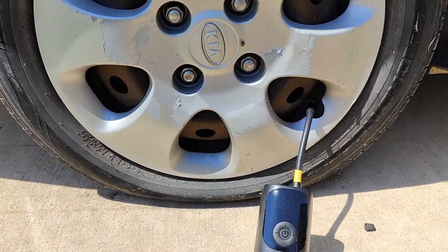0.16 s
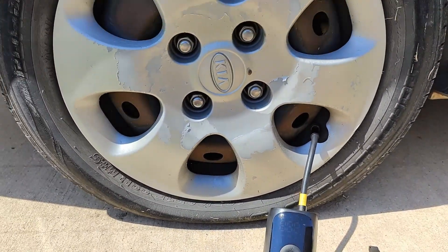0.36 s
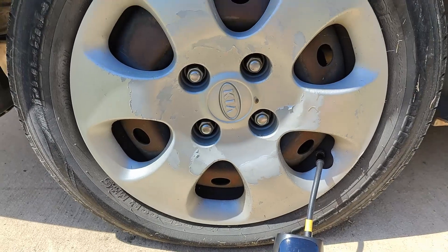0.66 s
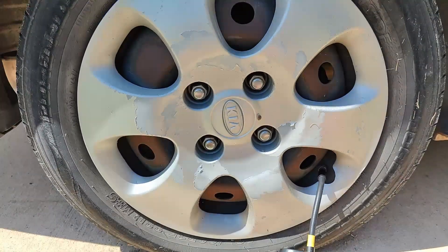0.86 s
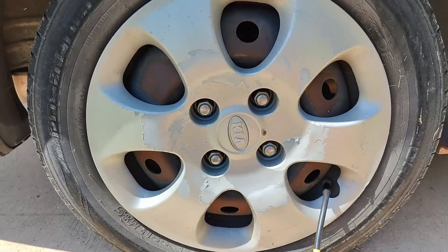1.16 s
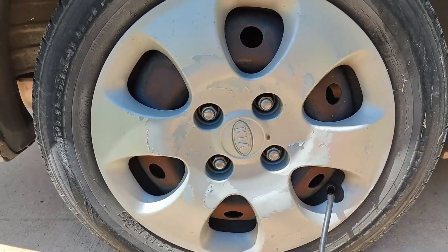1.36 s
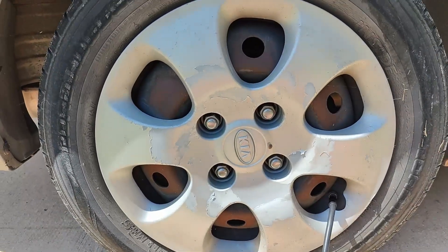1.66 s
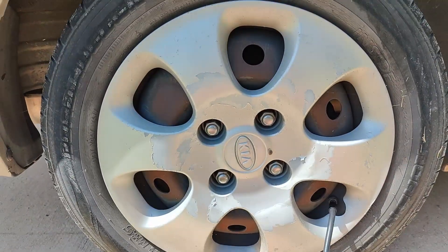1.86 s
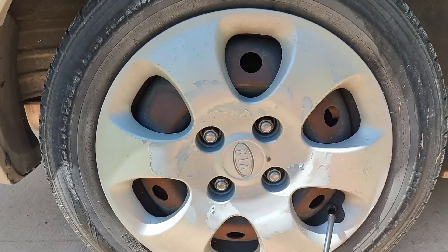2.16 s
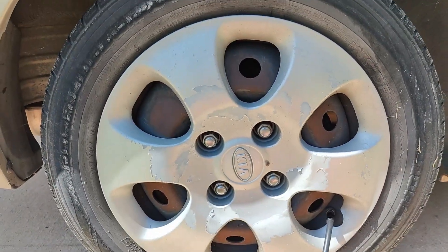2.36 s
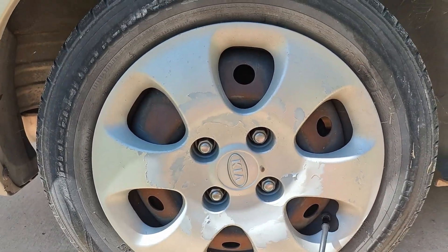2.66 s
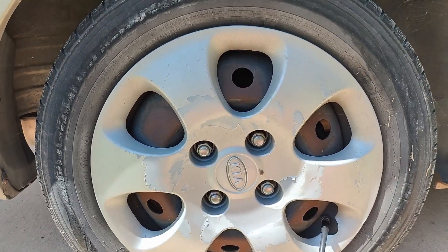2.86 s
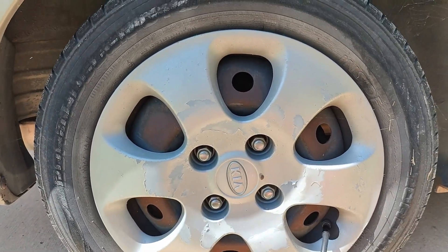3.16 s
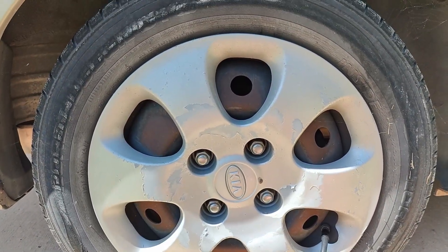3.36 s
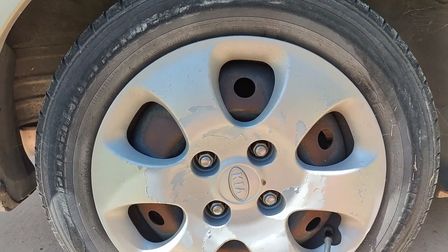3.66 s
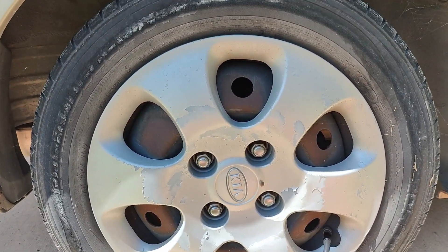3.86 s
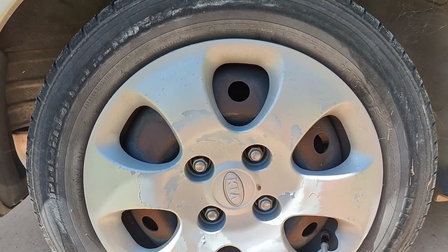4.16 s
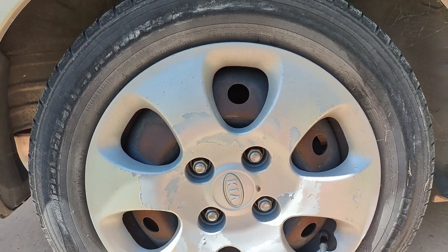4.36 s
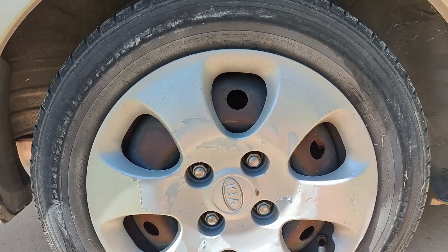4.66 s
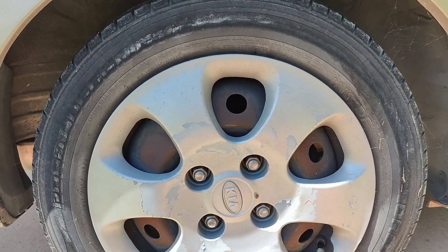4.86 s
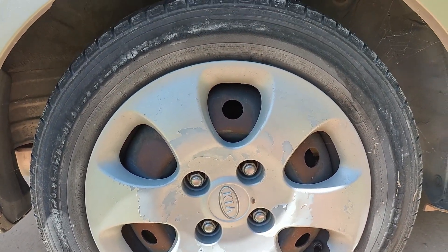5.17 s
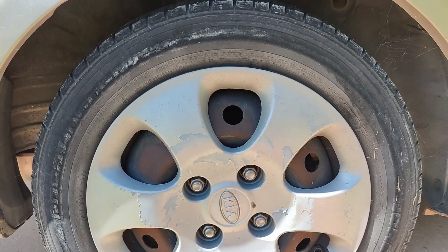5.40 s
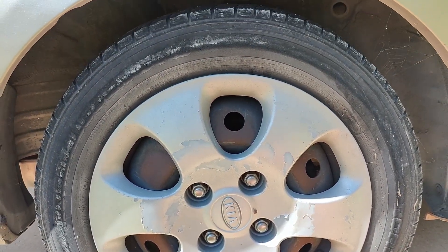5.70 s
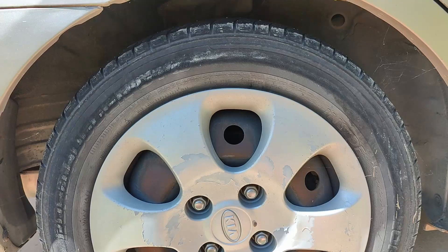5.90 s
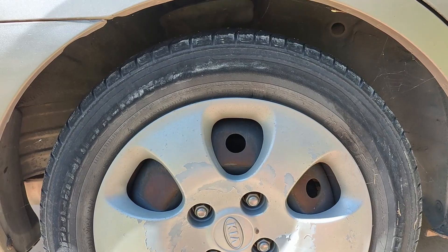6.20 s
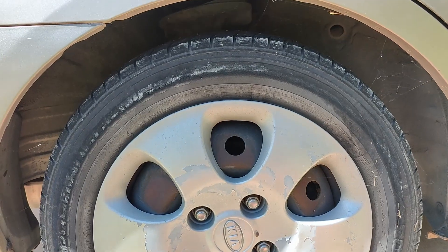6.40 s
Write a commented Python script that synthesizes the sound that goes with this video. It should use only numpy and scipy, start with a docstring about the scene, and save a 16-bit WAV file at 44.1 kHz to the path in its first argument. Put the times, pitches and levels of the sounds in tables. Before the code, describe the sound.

A portable tire inflator runs without a break on concrete beside a car wheel, giving a bright, rattling buzz with a thin, fluttering hiss and a faint low hum underneath. Midway, wind bumps gently against the microphone. The motor's pitch sags very slightly as pressure builds, and the color of the buzz shifts as the nearby microphone rises away from the pump.

```python
"""A small compressor pumps up a car tire

A hand-sized piston pump stands on concrete and makes about 51 strokes a second. Every turn of its crank
brings the same knocks (piston, valves, slack gears), a loose rattle, a gasp of air and faint chirps.
The motor slows a little as the pressure builds. The microphone drifts upward, so the tone slowly shifts.
Underneath are a faint hum and two soft puffs of wind."""
import sys
import numpy as np
from scipy import signal
from scipy.fft import rfft, irfft, next_fast_len
from scipy.io import wavfile
from scipy.ndimage import uniform_filter1d, map_coordinates

SR = 44100
rng = np.random.default_rng(int(sys.argv[2]) if len(sys.argv) > 2 else 0)


def store_wav(level_fs):
    """Save 16-bit WAV to argv[1]."""
    pcm = np.round(np.clip(np.atleast_2d(level_fs), -1, 1) * 32767)
    wavfile.write(sys.argv[1], SR, pcm.T.astype(np.int16))


N = 288404
TIME = np.arange(N) / SR
FFT_SIZE = 2 * next_fast_len(N // 2 + 1)
FREQS = np.fft.rfftfreq(FFT_SIZE, 1 / SR)

# the knocks of one turn: (place in the turn [0-1], strength [dB], ring pitch [Hz], ring width [Hz])
KNOCKS = [(0.0757, -12.8, 460, 332), (0.2805, -6.5, 1237, 593), (0.321, -0.6, 2374, 262),
          (0.3464, -8.7, 3756, 558), (0.4334, 2.4, 2079, 223), (0.4512, -5.5, 3045, 548),
          (0.5517, -1.8, 2962, 396), (0.5558, -3.0, 1099, 584), (0.6426, -2.6, 1884, 896),
          (0.6917, -3.4, 3562, 483)]
# how well the housing gives off each harmonic: (multiple of the crank rate [count], level [dB])
HOUSING_LOW = [(1, -39.2), (2, -38.0), (3, -56.0), (4, -40.5), (5, -49.8), (6, -43.6), (7, -47.4),
               (8, -40.3), (9, -43.7), (10, -40.8), (11, -38.6), (12, -43.4), (13, -44.2), (14, -40.1),
               (15, -36.0), (16, -46.2), (17, -51.6), (18, -44.4), (19, -33.1), (20, -36.7), (21, -33.3),
               (22, -33.1), (23, -34.8), (24, -36.0), (25, -43.6), (26, -43.6), (27, -46.9), (28, -34.8),
               (29, -38.2), (30, -38.4), (31, -37.5), (32, -46.0), (33, -41.4), (34, -44.1), (35, -36.3),
               (36, -29.2), (37, -31.0), (38, -37.5), (39, -45.0), (40, -40.7), (41, -38.3), (42, -29.3),
               (43, -28.9), (44, -30.8), (45, -42.8), (46, -31.3), (47, -29.5), (48, -37.0), (49, -42.1),
               (50, -39.4)]
# the same for the harmonics above those: (pitch [Hz], level [dB])
HOUSING_HIGH = [(2620, -40), (2850, -48.5), (3100, -40), (3450, -42), (3750, -39.5), (3950, -46.5),
                (4200, -48), (4600, -55), (5200, -62.5), (5700, -79)]
# each ringing tone of the housing beams toward one height:
# (pitch [Hz], width [Hz], height [0-1], spread in height [0-1], boost [dB])
HOUSING_BEAMS = [(480, 97, 0, .2, 2), (656, 48, 1, 0.3, 2), (1120, 130, 0.4, 0.11, 0), (1440, 60, 0, .2, 4),
                 (2140, 73, 0.53, 0.14, 1.5), (2430, 40, 0.27, 0.33, 2.5), (3100, 42, .25, 0.31, 2.5),
                 (3510, 52, 0.5, 0.22, 6.5), (3970, 42, 0, 0.63, 4), (4400, 54, 0.9, .1, 9)]
# tone of the loose gears and housing: (pitch [Hz], level [dB])
RATTLE_TONE = [(50, -43.3), (150, -47.6), (350, -52.9), (600, -48.0), (800, -43.0), (900, -44.8),
               (1050, -37.6), (1300, -46.7), (1500, -42.0), (1700, -42.6), (1880, -35.7), (2050, -39.1),
               (2400, -39.7), (2800, -46.3), (4000, -43.9), (4700, -50.3)]
# tone of the air in the valves and vents: (pitch [Hz], level [dB])
HISS_TONE = [(4700, -45), (5700, -55.5), (6200, -51.5), (6600, -46), (7100, -46.5), (7700, -56),
             (9600, -51.5), (10700, -57), (11200, -45), (11700, -57), (12700, -58.5), (14300, -57),
             (15100, -53.5), (15600, -46.5)]
# air flow over one turn: (place in the turn [0-1], level [dB])
AIR_FLOW = [(.08, -11.5), (.19, -7), (.25, -3), (.42, -0.5), (.57, -4), (.65, -7.5), (.8, -5.5), (.92, -5)]
# the piston seal chirps going up and down: (place in the turn [0-1], width [turns], level [dB])
SEAL_CHIRPS = [(.24, 0.12, -16), (.5, 0.043, -14.5), (.74, .045, -12.5)]
# wind on the microphone: (time [s], width [s], pitch [Hz], level [dB])
WIND_PUFFS = [(3.441, 0.02, 32, -25), (3.518, 0.064, 120, -36)]
# the microphone rises from the pump to the top of the wheel: (time [s], height [0-1])
MIC_RISE = [(0, 0), (1, 0.32), (2.5, 0.66), (5.4, 0.83), (6, 1)]
# balance of the two sides: (pitch [Hz], left minus right [dB])
STEREO_BALANCE = [(150, 2), (430, -2.5), (620, 9), (980, -9.5), (1250, -3.5), (1550, -7), (1900, -2.5),
                  (2500, -2.5), (3100, 6), (3650, 7.5), (4500, 2), (5600, -4.5), (6800, -19), (7900, -6),
                  (8500, -13.5), (10000, -4), (11900, -4.5), (13400, -16), (15500, -25.3)]
# how alike the two sides are: (pitch [Hz], likeness [0-1])
STEREO_LIKENESS = [(60, 0.99), (400, 1), (1000, 1), (2200, 1), (3500, 0.58), (6000, 0.25), (15000, 1)]
# how far the left wave runs ahead of the right: (pitch [Hz], lead [radians])
LEFT_LEAD = [(60, 0.06), (300, 0.46), (700, 1), (1000, -0.4), (1500, -1.26), (2300, -1), (3100, -1.06),
             (4000, -2.5), (7000, -1.65), (15000, -1.5)]


def crank(start_turn=.8106, start_hz=51.4833, sag_hz_per_s2=.0097, wobble=0.000405):
    """Counts the crank's turns. It slows more and more as the pressure builds."""
    speed = (start_hz - sag_hz_per_s2 * TIME ** 2) * (1 + wobble * wander(N, size=2500))
    return start_turn + np.cumsum(speed) / SR


def knocks(turns, level_db=0.37, drift_db=1.26, force_db=0.1, slop_turns=0.00058, turn_samples=2048):
    """Ringing knocks repeat every turn and blur into a buzz; the housing sets each harmonic's level."""
    strokes, low = int(turns[-1]) + 2, len(HOUSING_LOW)
    harmonic = np.arange(1, 113)
    hz = harmonic * (turns[-1] - turns[0]) / TIME[-1]
    blows = sum(amp(db) * np.exp(-2j * np.pi * harmonic * place)
                / (1 + 1j * (hz ** 2 - ring ** 2) / (hz * width)) for place, db, ring, width in KNOCKS)
    # low down, single housing tones set the level; higher up they overlap and the knocks' peaks remain
    strength = np.sqrt(smooth(abs(blows) ** 2, size=7))
    blows = blows / np.r_[abs(blows[:low]), strength[low:]]
    level = np.r_[np.transpose(HOUSING_LOW)[1], look_up(HOUSING_HIGH, hz[low:])]
    # tones swell and fade as the microphone moves through echoes off the ground and wheel
    stroke_times = np.interp(np.arange(strokes) + .5, turns, TIME)
    level = level + housing_beams(stroke_times, hz)
    level = level + drift_db * np.sqrt(hz / 1500) * wander((strokes, len(harmonic)), size=70)
    # no two strokes have quite the same force or timing
    force, lag = rng.standard_normal((2, strokes, 1))
    delay = np.exp(-2j * np.pi * harmonic * slop_turns * lag)
    direct = amp(level + level_db + force_db * force) * blows * delay
    # only high tones scatter off the wheel
    scattered = direct * 1j * np.clip(hz / 5000, 0, 1) ** 2 * np.sign(wander(len(harmonic), size=7))
    # build one wave per stroke, then play through them at the crank's pace
    spectra = np.pad(stereo(direct, scattered, hz), ((0, 0), (0, 0), (1, 0)))
    waves = irfft(spectra, turn_samples) * turn_samples / np.sqrt(2)
    position = [np.maximum(turns - .5, 0), turns % 1 * turn_samples]
    return np.array([map_coordinates(side, position, order=1, mode="grid-wrap") for side in waves])


def housing_beams(times, hz, near_db=-.1, far_loss_db=0.9):
    """Level change in dB as the microphone draws away and passes through the housing's beams of sound."""
    height = mic_height(times)[:, None]
    beams = sum(db * bell(hz, ring, width) * bell(height, aim, spread)
                for ring, width, aim, spread, db in HOUSING_BEAMS)
    return near_db - far_loss_db * height + beams


def rattle(pump, level_db=-1.2, follow=.42, flicker_db=.5):
    """Loose parts buzz at random; each pitch range swells with the knocks that shake it."""
    edges_hz = [0, 650, 1350, 2700, SR / 2]
    spectrum = rfft(pump.mean(0), FFT_SIZE)
    shaken = 0
    for low, high in zip(edges_hz, edges_hz[1:]):
        band = (FREQS >= low) & (FREQS < high)
        power = uniform_filter1d(irfft(spectrum * band)[:N] ** 2, size=70)
        shake = normalize(np.sqrt(abs(power)))
        swell = (1 - follow + follow * shake) * amp(flicker_db * wander(N, size=120))
        shaken = shaken + rfft(normalize(swell * rng.standard_normal((2, N))), FFT_SIZE) * band
    treble_cut = 1 / np.sqrt(1 + (FREQS / 4700) ** 30)
    bass_cut = (FREQS / np.hypot(FREQS, 42)) ** 2
    return shape_noise(irfft(shaken), amp(look_up(RATTLE_TONE, FREQS) + level_db) * treble_cut * bass_cut)


def air(turns, sputter_db=1.5):
    """One hissing gasp of air a turn; the vents shape its tone."""
    flow_db = np.interp(turns, *np.transpose(AIR_FLOW), period=1) + sputter_db * wander(N, size=30)
    gasps = normalize(amp(flow_db) * rush(turns, repeat=0.4))
    treble_only = np.sqrt(1 - 1 / (1 + (FREQS / 4700) ** 30))
    return shape_noise(gasps, amp(look_up(HISS_TONE, FREQS)) * treble_only)


def seal(turns, ring_hz=8560, width_hz=760, level_db=-55.5, beam_db=12):
    """The piston seal rubs in bursts and rings at one high pitch, louder as the microphone nears its beam."""
    rub = sum(amp(db) * bell(turns % 1, place, width) for place, width, db in SEAL_CHIRPS)
    beam = amp(beam_db * bell(mic_height(TIME), centre=0.97, width=0.29))
    bursts = normalize(rub * rush(turns, repeat=0.09)) * beam
    return shape_noise(bursts, amp(level_db) / (1 + 2j * (FREQS - ring_hz) / width_hz) ** 2)


def rush(turns, repeat, points=860):
    """The noise of swirling air; the share `repeat` is the same on every stroke."""
    loop = signal.resample(rng.standard_normal((2, points)), 8 * points, axis=1)
    repeated = loop[:, (turns % 1 * loop.shape[1]).astype(int)]
    return np.sqrt(repeat) * normalize(repeated) + np.sqrt(1 - repeat) * rng.standard_normal((2, N))


def low_hum(turns, level_db=-47, cycles_per_turn=.725, waver_db=6.0):
    """A faint, wavering hum pitched below the stroke rate."""
    loudness = amp(level_db + waver_db * wander(N, size=9000))
    return loudness * np.sqrt(2) * np.sin(2 * np.pi * cycles_per_turn * turns)


def wind():
    """Soft, low bumps of air on the microphone."""
    return sum(amp(db) * bell(TIME, when, width) * np.cos(2 * np.pi * hz * (TIME - when))
               for when, width, hz, db in WIND_PUFFS)


def mic_height(times):
    """How high the microphone is, from 0 to 1."""
    return np.interp(times, *np.transpose(MIC_RISE))


def stereo(direct, scattered, hz):
    """Left and right spectra: both share the direct sound, but scattered sound differs between them."""
    likeness = look_up(STEREO_LIKENESS, hz)
    shared = np.sqrt((1 + likeness) / 2) * direct
    apart = np.sqrt((1 - likeness) / 2) * scattered
    balance = amp(look_up(STEREO_BALANCE, hz))
    lead = np.exp(.5j * look_up(LEFT_LEAD, hz))
    sides = np.array([(shared + apart) * balance * lead, (shared - apart) / lead])
    return sides * np.sqrt(2 / (1 + balance ** 2))


def shape_noise(pair, gain):
    """Gives two noises a tone (gain per 50 Hz band) and spreads them left and right."""
    direct, scattered = rfft(pair, FFT_SIZE) * gain * np.sqrt(SR / 100)
    return irfft(stereo(direct, scattered, FREQS))[:, :N]


def amp(db):
    """Turns decibels into a gain."""
    return 10 ** (np.asarray(db) / 20)


def normalize(x):
    """Scales a signal to an average power of 1."""
    return x / np.sqrt(np.mean(abs(x) ** 2) + 1e-20)


def look_up(table, hz):
    """Reads between a table's rows, with pitch on a log scale."""
    pitches, values = np.transpose(table)
    return np.interp(np.log(hz + 1), np.log(pitches + 1), values)


def smooth(x, size):
    """Averages twice over `size` neighbours along the first axis."""
    return uniform_filter1d(uniform_filter1d(x, size, 0), size, 0)


def wander(shape, size):
    """A smooth random drift; a larger size makes it slower."""
    return normalize(smooth(rng.standard_normal(shape), size))


def bell(x, centre, width):
    """A smooth bump of height 1."""
    return np.exp(-.5 * ((x - centre) / width) ** 2)


def scene():
    """One crank drives all the pump's sounds; wind is added to them."""
    turns = crank()
    pump = knocks(turns)
    return pump + rattle(pump) + air(turns) + seal(turns) + low_hum(turns) + wind()


def record(dry, cutoff_hz=15800):
    """Cuts off the very highest treble."""
    low_pass = signal.firwin(801, cutoff_hz, window=("kaiser", 9), fs=SR)
    return signal.oaconvolve(dry, low_pass[None], "same")


dry = scene()
out = record(dry)
store_wav(out)
```